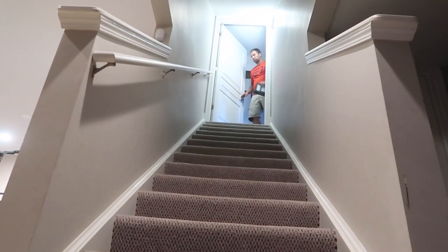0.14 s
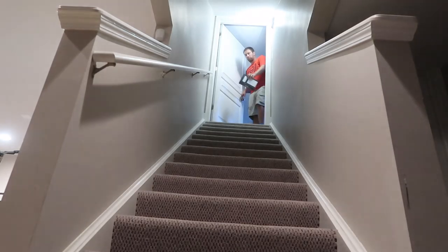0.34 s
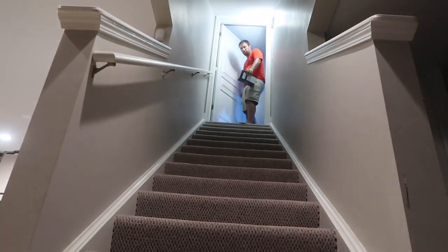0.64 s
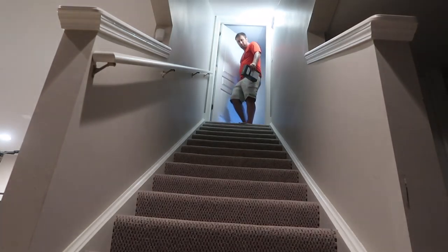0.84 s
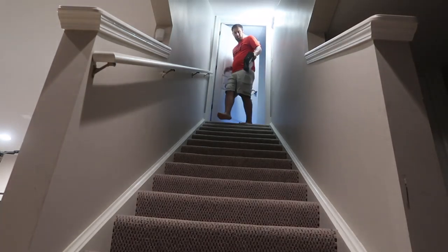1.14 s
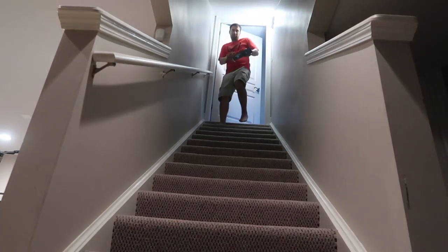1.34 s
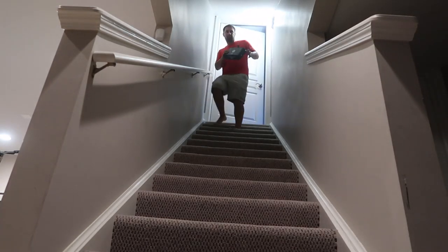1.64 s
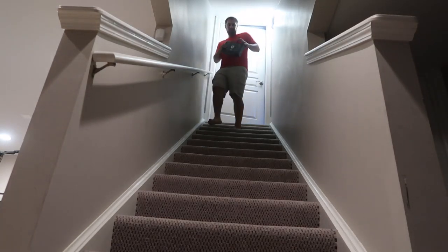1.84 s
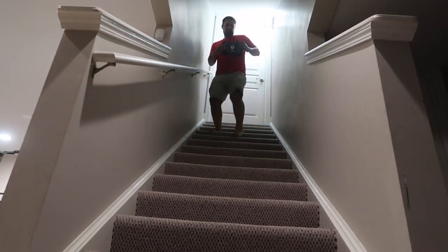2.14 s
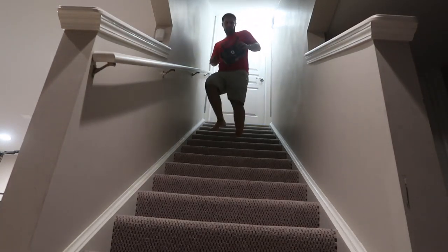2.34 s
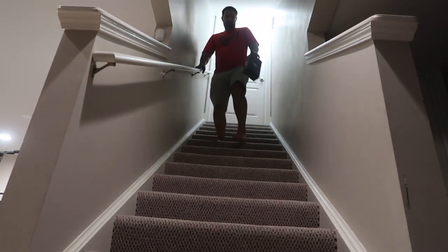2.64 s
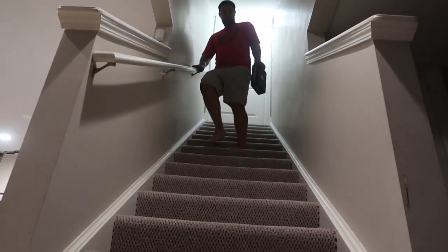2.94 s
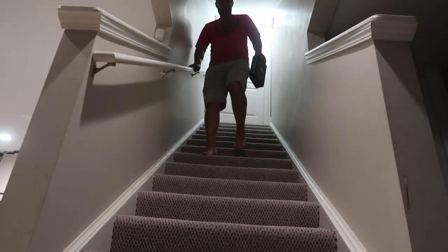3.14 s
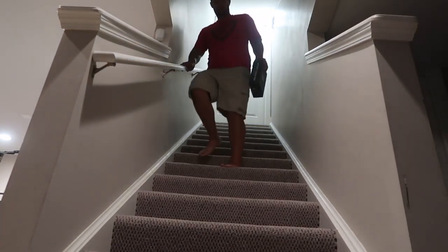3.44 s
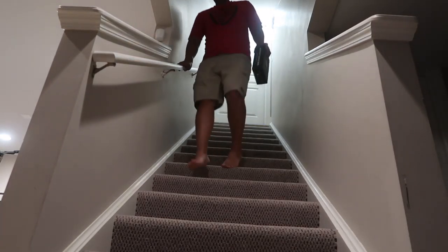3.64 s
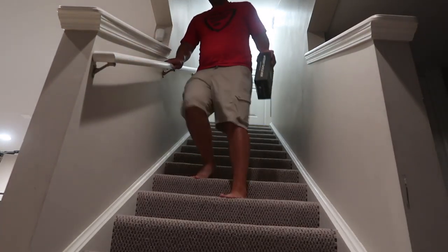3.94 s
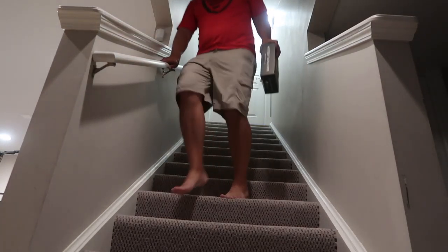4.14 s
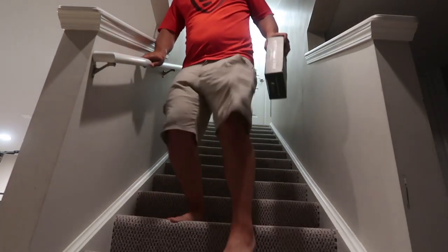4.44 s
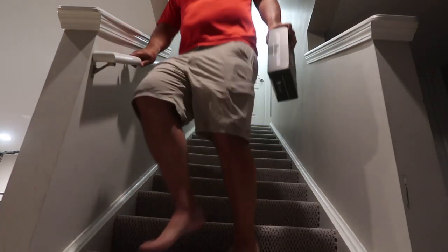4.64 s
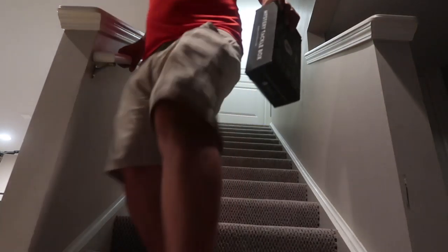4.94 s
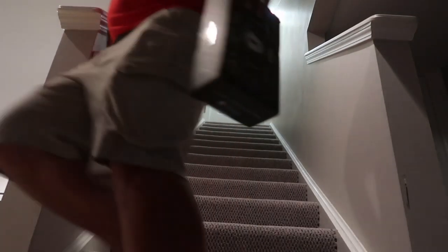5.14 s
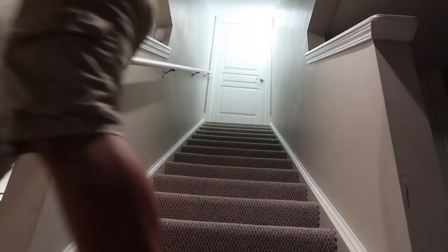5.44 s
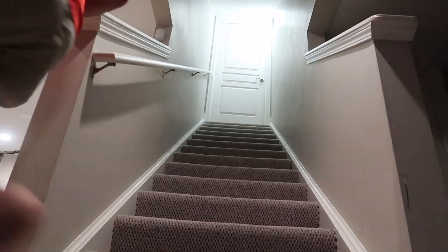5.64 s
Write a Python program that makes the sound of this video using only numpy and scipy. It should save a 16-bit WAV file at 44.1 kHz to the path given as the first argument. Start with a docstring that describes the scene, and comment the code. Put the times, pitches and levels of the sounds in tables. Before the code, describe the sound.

A quiet house interior hums low and steady, with a soft rumble. In the first second there are only faint bumps and small ticks from the top of a staircase. From about 1.4 s, dull footfalls mix with a gritty knob and latch rattle and a tiny metallic tinkle near 1.6 s. A short creaky rub leads to the door shutting with a hard knock at 2.2 s, then a sharp latch snap at 2.56 s. Bare feet thump down carpeted wooden treads at roughly 2.65, 2.8, 2.93, 3.25, 3.4, 3.8 and 3.95 s, low and padded, with airy swishes of cloth and hand on rail. The deepest, loudest thump lands at 4.5 s with small creaks; a firmer, higher-pitched step hits at 5.1 s. Light scuffs and rustles remain until 5.8 s, slightly left and duller. Short stairwell echoes; the microphone stays near the bottom.

```python
"""Door and bare feet on the stairs

A door at the head of a carpeted wooden staircase is pulled shut; bare feet then thump down the treads.
Pushes ring the stair frame in low thumps; blows with gritty rattles make knocks, clatter and creak grains.
Bands of flickering noise make the swish of clothes and of a hand on the rail, the rubbing and the rumble.
The house hums softly: steady noise, with a few narrow resonances fed by noise. The stairwell echoes."""
import sys
import numpy as np
from scipy import signal
from scipy.io import wavfile

SR = 44100
rng = np.random.default_rng(int(sys.argv[2]) if len(sys.argv) > 2 else 0)


def transcribe(signal):
    """Save signal, clipped to [-1, 1], as a 16-bit WAV file at the path in sys.argv[1]."""
    frames = np.atleast_2d(signal).T
    limited = np.clip(frames, -1, 1)
    pcm = np.round(limited * 32767).astype(np.int16)
    wavfile.write(sys.argv[1], SR, pcm)


N = 254898  # length in samples


def from_db(db):
    """Decibels to a plain factor on the wave's size."""
    return 10 ** (np.asarray(db) / 20)


def power_sum_db(*levels_db):
    """Unrelated sounds add by power; gives their joint level in dB."""
    return 10 * np.log10(sum(from_db(db) ** 2 for db in levels_db))


def rms_one(x):
    """Scale a sound to an average strength (RMS) of 1."""
    return x / np.sqrt(np.mean(x ** 2) + 1e-20)


def in_time(rows):
    """Draw straight lines between table rows, one curve for each column after the time."""
    s, *columns = np.transpose(rows)
    return [np.interp(np.arange(N) / SR, s, column) for column in columns]


def at_hz(points, hz):
    """Read a table at a frequency, on a logarithmic frequency scale."""
    table_hz, values = np.transpose(points)
    return np.interp(np.log(hz), np.log(table_hz), values)


def add(track, s, sound):
    """Mix a short sound in at a time."""
    i = round(s * SR)
    track[i:i + len(sound)] += sound[:N - i]


def lowpass(x, order, hz):
    """Keep what lies below a frequency."""
    return signal.sosfilt(signal.butter(order, hz, fs=SR, output="sos"), x)


def highpass(x, order, hz):
    """Keep what lies above a frequency."""
    return signal.sosfilt(signal.butter(order, hz, "high", fs=SR, output="sos"), x)


def resonance(x, hz, width_hz):
    """One vibrating mode: a two-pole filter that passes a narrow band around its pitch."""
    r = np.exp(-np.pi * width_hz / SR)
    gain = (1 - r * r) / 2
    return signal.lfilter(np.array([1, 0, -1]) * gain, [1, -2 * r * np.cos(2 * np.pi * hz / SR), r * r], x)


def drift(rate_hz):
    """Slow random wandering with RMS 1: noise smoothed by two equal poles at the given rate."""
    step = 40  # samples between computed points
    r = np.exp(-2 * np.pi * rate_hz * step / SR)
    noise = rng.standard_normal(N // step + 2002)
    slow = signal.lfilter([1], [1, -2 * r, r * r], noise)[2000:]  # drop the filter's start
    return np.interp(np.arange(N) / step, np.arange(len(slow)), rms_one(slow))


# how alike left and right are: f/Hz, likeness (1 = identical, 0 = unrelated)
LEFT_RIGHT_LIKENESS = [(60, 1), (125, .9999), (180, 1), (250, 0.63), (1000, 0.68), (2000, 0.69),
                       (4000, 0.46), (8000, 0.22), (12000, 0.02)]


def banded_noise(spectrum, patchy_db, tilt_db=0, hump_hz=1000, hump_db=0):
    """Half-octave bands of stereo noise, each with its own level, flicker and left-right likeness."""
    out, power = 0, 0
    together = drift(6)  # flicker shared by all bands
    edges = 22 * 2 ** np.arange(0, 9.8, .5)
    white = rng.standard_normal((2, 2, N))  # neighbouring bands get unrelated noise
    for k, (low, high) in enumerate(zip(edges, edges[1:])):
        hz = np.sqrt(low * high)
        if not .8 * spectrum[0][0] < hz < 1.2 * spectrum[-1][0]:
            continue
        band = signal.butter(2, [low, high], "band", fs=SR, output="sos")
        mid, side = signal.sosfilt(band, white[k % 2])
        alike = at_hz(LEFT_RIGHT_LIKENESS, hz)
        hump = np.exp(-.5 * (np.log2(hz / hump_hz) / 0.3) ** 2)
        colour_db = tilt_db * np.log2(hz / 4000) + hump_db * hump
        flicker_db = patchy_db * (0.6 * together + drift(12.6))
        gain = from_db(at_hz(spectrum, hz) + colour_db + flicker_db)
        out = out + gain * (np.sqrt(1 + alike) * mid + np.sqrt(1 - alike) * side * [[1], [-1]])
        power += from_db(at_hz(spectrum, hz)) ** 2 * 2 * (high - low) / SR
    return out / np.sqrt(2 * power)  # RMS near 1 before colour and flicker


# colour of the quiet house noise: f/Hz, relative level/dB per Hz
HOUSE_COLOUR = [(15, -35), (25, -12), (110, -8), (164, 4), (227, 9.5), (522, -8), (870, -20), (1800, -15),
                (2770, -32), (4610, -16), (13200, -30), (14300, -39), (15500, -73)]


def house_noise():
    """The quiet background of the house is softly flickering noise."""
    return from_db(-59) * banded_noise(HOUSE_COLOUR, patchy_db=1.5)


# wavering hums of the house: f/Hz, width/Hz, level/dB
HOUSE_HUMS = [(54.7, 5.3, -64), (124, 2.5, -57), (241.8, 4.4, -61.5), (13000, 40, -89)]


def hums():
    """Noise through narrow resonances gives hums that waver."""
    out = 0
    for hz, width_hz, level_db in HOUSE_HUMS:
        out = out + from_db(level_db) * rms_one(resonance(rng.standard_normal(N), hz, width_hz))
    return out


def stirred(level_db, share, early_s, t60_s, db_per_oct=0):
    """A level in dB that jumps at every low thump and dies away; level_db is for -21 dB at 120 Hz."""
    s, peak_db, centre_hz = np.transpose(LOW_THUMPS)[:3]
    kick_db = level_db + share * (peak_db + 21.0) + db_per_oct * np.log2(centre_hz / 120)
    kicks = np.zeros(N)
    np.add.at(kicks, ((s - early_s) * SR).astype(int), from_db(kick_db) ** 2)
    fall = from_db(-120 / (t60_s * SR))  # power falls 60 dB in t60_s
    rise = np.exp(-1 / (0.0023 * SR))
    power = signal.lfilter([1 - rise], [1, -fall - rise, fall * rise], kicks + 1e-18)
    return 10 * np.log10(power + 1e-12)


# colour of the stair frame's rumble: f/Hz, relative level/dB per Hz
RUMBLE_COLOUR = [(20, 6), (35, -3.5), (52, 5), (80, 0), (110, 3), (200, -0.5), (400, -16)]


def frame_rumble():
    """The stair frame rumbles at rest and more after each thump; deep thumps shake it most."""
    resting_db = -54
    shaken_db = stirred(level_db=-46.5, share=0.5, early_s=-0.02, t60_s=1, db_per_oct=-6.5)
    return from_db(power_sum_db(resting_db, shaken_db)) * banded_noise(RUMBLE_COLOUR, patchy_db=2.5)


# colour of rubbing and scuffing: f/Hz, relative level/dB per Hz
SCUFF_COLOUR = [(150, -9), (300, 4.5), (500, 0.5), (1000, 3), (1800, -6), (3500, -10.5)]
# steady rubbing of door edge and soles: t/s, level/dB
RUBBING = [(0.0, -55), (.4, -57.5), (.7, -56.5), (1.09, -56.5), (1.53, -50.5), (1.96, -55.5), (2.22, -50),
           (3.64, -55), (4.45, -51.5), (4.95, -51), (5.1, -46.5), (5.3, -48.5), (5.5, -52.5), (5.78, -50)]


def rubbing_and_scuffs():
    """Door edge and soles rub steadily, and every low thump adds a dying scuff, all as noise."""
    scuff_db = stirred(level_db=-52.5, share=0.17, early_s=0, t60_s=.5)
    return from_db(power_sum_db(*in_time(RUBBING), scuff_db)) * banded_noise(SCUFF_COLOUR, patchy_db=1.86)


# colour of the swishes: f/Hz, relative level/dB per Hz
SWISH_COLOUR = [(710, -24), (1200, -35), (1450, -4.5), (1960, -7), (2560, 0), (2820, -3), (4280, -2),
                (7390, -3.5), (12100, -6), (14200, -6.5), (15500, -32)]
# swishes of cloth and of the hand on the rail: start t/s, length/s, level/dB, brightness/dB per octave,
# lift of the hiss near 7 kHz/dB, share of the length spent swelling
STRIDE_SWISHES = [(1.448, 0.088, -53.5, -1, 3, 0.36), (1.497, 0.34, -54.5, -3.5, 0, 0.32),
                  (1.952, 0.7, -56.5, -2, 0, 0.3), (2.55, 0.72, -54, -5, 0.5, 0.23),
                  (2.998, 0.57, -45.5, -4.2, 1, 0.61), (3.307, 0.38, -52.5, -4, -2, 0.55),
                  (3.606, 0.44, -46.5, -4, 0.5, 0.52), (3.864, 0.34, -49, -3.5, 1.5, 0.55),
                  (4.179, 0.46, -48, -3, 5.5, 0.44), (4.4, 0.39, -49.5, -2, -1, .45),
                  (4.62, 1, -54.5, -0.2, 0, 0.28), (5.493, 0.72, -51.5, -3.5, -3, 0.29)]


def swishes():
    """Each swish of rubbing cloth or hand is noise that swells and fades smoothly with its own colour."""
    t = np.arange(N) / SR
    start, length, level_db, bright_db, hiss_db, swell = np.transpose(STRIDE_SWISHES)[:, :, None]
    part = np.clip((t - start) / length, 0, 1)
    shape = np.sin(np.pi / 2 * np.minimum(part / swell, (1 - part) / (1 - swell)))
    power = (from_db(level_db) * shape ** 1.3) ** 2
    still = from_db(-61.5) ** 2  # rustle between swishes
    total = power.sum(axis=0) + still
    # overlapping swishes blend their colours by power; the rustle leans -3 dB per octave
    tilt_db = ((power * bright_db).sum(axis=0) - 3 * still) / total
    hump_db = (power * hiss_db).sum(axis=0) / total
    noise = banded_noise(SWISH_COLOUR, patchy_db=1.36, tilt_db=tilt_db, hump_hz=6650, hump_db=hump_db)
    return np.sqrt(total) * noise


# a loose metal part of the knob tinkles: t/s, level/dB (RMS starts 2 dB lower), f/Hz
KNOB_TINKLES = [(1.484, -56, 9500), (1.5289, -54, 8900), (1.628, -49, 8700), (1.638, -55, 8800),
                (1.647, -50, 8900), (1.6624, -49, 8900), (1.688, -58, 8800)]


def tinkles():
    """Loose metal gives short high rings, roughened because noise drives the resonance."""
    width_hz, t60_s = 500, .05
    out, t = np.zeros(N), np.arange(int(.1 * SR)) / SR
    for s, level_db, hz in KNOB_TINKLES:
        noise = rng.standard_normal(len(t))
        ring = rms_one(resonance(noise, hz, width_hz)) * from_db(-60 * t / t60_s)
        add(out, s, from_db(level_db - 2.0) * ring)
    return out


def knocks(rows, body):
    """Each knock is a blow and a short gritty rattle; dense modes ring on as dying noise in each resonance."""
    out, t = np.zeros(N), np.arange(int(.25 * SR)) / SR
    for s, level_db, tilt_db, share, blow_db, top_hz, rattle_ms in rows:
        contacts, dense = rng.standard_normal((2, len(t)))
        rattle = np.exp(-1000 * t / rattle_ms)
        blow = from_db(blow_db) * (t == 0)  # a single sample
        grit = contacts ** 2 * np.sign(contacts)  # squaring makes strong contacts stand out
        strike = 0.45 * grit * rattle * np.minimum(t / 0.0022, 1) + blow
        knock = 0
        for k, (hz, width_hz, mode_db, t60_s) in enumerate(body):
            ringing = from_db(-6.5) * from_db(-60 * t / (t60_s * share)) * (1 - rattle)
            drive = strike + np.roll(dense, 500 * k) * ringing
            gain = (-1) ** k * from_db(mode_db + tilt_db * np.log2(hz / 1000))
            knock = knock + gain * resonance(drive, hz, width_hz)
        knock = lowpass(knock, 3, top_hz) + from_db(-46) * blow  # plus a faint bare click
        early_rms = np.sqrt(np.mean(knock[:round(.006 * SR)] ** 2))
        add(out, s, from_db(level_db - 7.5) * knock / early_rms)
    return out


# the latch bolt snaps and grates: t/s, level/dB (RMS of the first 6 ms is 7.5 dB lower),
# treble tilt/dB per octave, ring time as a share of t60, first blow/dB, highest pitch excited f/Hz,
# time constant of the rattle/ms
LATCH_SNAPS = [(1.121, -36, -2.5, 0.68, 19, 9000, 1.8), (1.583, -36, 4, .8, -3, 5000, 5.8),
               (1.596, -34.5, -2, 0.88, -3, 5000, 8.5), (1.625, -27.5, 2, 0.93, 4, 13000, 4),
               (1.645, -31, 0.5, 1, 9, 7000, 5.3), (1.654, -31, -1, 1, 10, 6000, 3.6),
               (2.564, -14.5, -0.5, 0.87, 13, 8000, 2.4)]
# resonances of the latch: f/Hz, width/Hz, level/dB, t60/s
LATCH_MODES = [(495, 350, -12, 0.036), (873, 140, 1, 0.03), (1130, 130, -1, 0.016), (1460, 74, -8.5, .04),
               (1980, 170, -18.5, 0.033), (3140, 360, -18, 0.016), (5170, 780, -23.5, .008),
               (8500, 810, -29, .006)]


def latch():
    """The bolt's snaps and grating set the small resonances of the latch ringing."""
    return knocks(LATCH_SNAPS, LATCH_MODES)


# knocks hard and soft, clatter, short rustles and creak grains: t/s,
# level/dB (RMS of the first 6 ms is 7.5 dB lower), treble tilt/dB per octave, ring time as a share of t60,
# first blow/dB, highest pitch excited f/Hz, time constant of the rattle/ms
KNOCKS_AND_CLATTER = [(0.626, -45, 1, 1, 5, 8000, 6.3), (0.739, -43.5, -4, 2, -12, 5000, 14),
                      (.797, -47, -7, 1, 5, 2000, 3), (1.037, -46, -6, 0.63, 3, 6000, 4),
                      (1.458, -43, -7, 1.3, -10, 6000, 21), (1.486, -41.5, -3, 0.89, -8, 11000, 6.1),
                      (1.529, -39, -6, 1.2, 7, 11000, 4.2), (1.541, -41, 4, .7, 3, 12000, 2.8),
                      (1.603, -41, 2, .81, -2, 4500, 7), (1.633, -29.5, -1.5, .6, 8, 4500, 2.2),
                      (1.639, -28, -6.5, 0.8, 9, 5000, 3), (1.663, -38.5, 3, .7, 8, 14000, 4),
                      (1.971, -35.5, -9.5, 2.1, 7, 8000, 6), (2.1, -44, -5, 1.5, -10, 9000, 14),
                      (2.12, -38, -5.5, 1.6, -10, 9000, 13), (2.14, -35, -10, 1.7, -10, 6000, 10),
                      (2.159, -33.5, -11, 2.2, -8, 5000, 10), (2.18, -34.5, -8, 1.4, -8, 5000, 8),
                      (2.2, -34, -6, 1.8, 0, 5000, 5), (2.212, -35, -4, 1.2, 0, 9500, 4.4),
                      (2.226, -16.5, 2.5, 0.73, 3, 8400, 5.3), (2.234, -18, 0, 0.9, 16, 7000, 7.1),
                      (2.243, -24, 3, 1.4, 13, 8000, 4), (2.258, -32, 3, 0.81, 8, 5000, 5.4),
                      (2.282, -34, 3, .9, 5, 5500, 3.6), (2.306, -27, -4.5, 1.1, 13, 5000, 4.8),
                      (2.322, -36, 4, .6, 3, 2500, 5), (2.322, -48, 9, 0.66, 5, 13000, 3.2),
                      (2.334, -37, -4, 1.1, 9, 7000, 3.3), (2.39, -38, -4, 0.66, 12, 7000, 5.1),
                      (2.446, -47, -5, .7, 10, 9200, 3), (2.49, -42, 9.5, 0.72, 13, 9100, 4),
                      (2.497, -36, -6.5, 1.3, -6, 8000, 4), (2.573, -26.5, -2, 0.9, 0, 2600, 6),
                      (2.585, -30, -0.5, .8, 3, 6500, 4.4), (2.596, -32, -10, 1.14, -9, 2800, 6),
                      (2.608, -37, 4, .7, 7, 2600, 5), (2.654, -38, 2, 0.78, 0, 4000, 6),
                      (2.672, -37.5, 0, .7, -5, 5000, 8.9), (2.742, -44, 3, .8, -8, 5000, 10),
                      (2.947, -37, 0, 1.6, 15, 8500, 4.4), (4.011, -39, -2, 0.68, 5, 3000, 2.6),
                      (4.023, -41.5, -8, .7, 0, 3000, 5), (4.036, -36, -5, .8, 3, 5000, 3.7),
                      (4.047, -42, 6, .7, 3, 6000, 4), (4.06, -41, 2, 1, -5, 5000, 9),
                      (4.075, -48, 1, 0.96, 0, 4000, 4.2), (4.209, -39, -3.5, 0.64, 21, 8500, 4),
                      (4.59, -32, -9, 0.88, 12, 8500, 4), (4.598, -40, -1, 1, 0, 5000, 5),
                      (4.608, -38.5, -2, 1.2, 7, 6000, 4.9), (4.636, -42, -3, .8, 0, 4000, 5),
                      (4.728, -40, 3.5, 0.58, 14, 8000, 2.6), (4.807, -39.5, -8, 0.89, 0, 8500, 4.5),
                      (5.092, -28, -11, 0.36, 22, 2000, 2.6), (5.108, -37.5, -10, .7, -2, 2500, 8.2),
                      (5.13, -42, 2.5, 1.5, 10, 8500, 3.2), (5.213, -40, 3, 0.65, 10, 8000, 3),
                      (5.389, -43, 4, 0.84, 20, 9000, 3.6), (5.51, -35, -9.5, 0.45, 16.5, 8500, 4.7),
                      (5.702, -40, -7, 0.49, 2, 8500, 3.6), (5.735, -41, 0, 1.2, -8, 2800, 17)]
# broad resonances of door panel and hardware: f/Hz, width/Hz, level/dB, t60/s
DOOR_MODES = [(338, 73, -3.5, 0.21), (540, 380, -3, 0.17), (867, 93, 5.5, 0.062), (976, 70, 7.5, 0.032),
              (1122, 140, 6.5, 0.028), (1470, 190, 1.5, 0.052), (1860, 300, 3, 0.038),
              (2270, 310, -2, 0.053), (2897, 180, -1.5, 0.048), (3230, 165, 0, 0.029),
              (3540, 200, -2.5, 0.037), (4000, 730, -8, 0.043), (5200, 500, -11, 0.025),
              (6070, 440, -9, 0.017), (6790, 1000, -16.5, 0.023), (8400, 1700, -24, 0.015),
              (11000, 4000, -25, 0.015), (14000, 2500, -26, .015)]


def knocks_and_clatter():
    """Knocks hard and soft, clatter, rustles and creak grains all sound through the same broad resonances."""
    return knocks(KNOCKS_AND_CLATTER, DOOR_MODES)


# low thumps: feet on the treads, the door shutting, and settling: t/s, peak level/dB,
# centre of the ring f/Hz, base ring time/s, slap/dB over the peak (before its modes' levels)
LOW_THUMPS = [(0.093, -35.5, 184, .3, -16), (0.629, -45, 58.3, .085, -24), (0.828, -43, 118, 0.34, -16),
              (1.318, -39.5, 118, 0.35, -29), (1.396, -26.5, 97, 0.11, -21), (1.422, -24.5, 117, 0.2, -38),
              (1.455, -31.5, 133, 0.17, -11), (1.577, -27.5, 52.3, 0.063, -11),
              (1.628, -25.5, 138, 0.15, -15), (2.08, -26, 56, 0.25, -35), (2.112, -26, 138, 0.38, -18),
              (2.164, -36, 298, .25, -11), (2.184, -34, 296, 0.24, -7), (2.205, -32, 350, 0.17, -5),
              (2.236, -19.5, 120, 0.078, -24), (2.26, -22.5, 118, 0.19, -15.5),
              (2.289, -31.5, 47.6, 0.5, -28), (2.397, -37.5, 103, 0.15, -28), (2.648, -16, 154, 0.13, -32),
              (2.675, -21.5, 152, 0.19, -21), (2.693, -23, 137, 0.2, -33),
              (2.803, -17.5, 166, 0.068, -16.5), (2.824, -19, 133, .17, -14),
              (2.715, -30.5, 55.3, 0.21, -32), (2.849, -32.5, 51.5, 0.13, -12),
              (2.928, -18.5, 143, 0.15, -31), (2.946, -21.5, 128, 0.15, -21), (3.207, -31, 149, 0.13, -14),
              (3.22, -23, 128, 0.25, -25), (3.244, -19, 121, 0.19, -31), (3.265, -29, 125, .14, -30),
              (3.299, -30.5, 126, 0.14, -30), (3.371, -29.5, 198, .06, -10), (3.378, -17, 149, 0.13, -15),
              (3.407, -23.5, 119, 0.12, -16), (3.436, -28, 99, 0.23, -15), (3.768, -30, 148, 0.19, -14),
              (3.799, -25, 136, 0.19, -23), (3.808, -29.5, 127, 0.12, -21), (3.832, -28, 78.6, 0.095, -31),
              (3.871, -36, 72, 0.1, -22), (3.947, -22.5, 120, 0.21, -10.5), (3.991, -28.5, 95, 0.23, -9),
              (4.023, -32.5, 190, 0.081, -10), (4.032, -30, 240, 0.094, -14),
              (4.062, -29.5, 203, 0.12, -25), (4.352, -26.5, 110, 0.19, -15.5),
              (4.399, -29, 118, 0.24, -28), (4.47, -32, 104, .068, -28), (4.511, -19, 176, 0.093, -13),
              (4.521, -10, 116, 0.18, -19), (4.548, -23.5, 150, 0.16, -20), (4.589, -28.5, 115, 0.14, -7.5),
              (4.658, -34, 124, 0.074, -25), (4.754, -27, 101, 0.15, -18), (4.868, -30, 204.5, .088, -8),
              (4.92, -33.5, 159, 0.058, -16), (5.073, -24, 165, 0.088, -13.5),
              (5.087, -14, 340, 0.046, -12), (5.093, -21.5, 252, 0.057, -26), (5.106, -29, 190, 0.075, -14),
              (5.152, -29.5, 110, 0.06, -12.5), (5.198, -36.5, 340, 0.084, -20),
              (5.225, -34.5, 198, .1, -25), (5.25, -32, 230, 0.11, -23), (5.505, -43, 129, .11, -17)]
# modes of treads and stair frame: f/Hz, level/dB, t60 as a share of the base ring time
STAIR_MODES = [(36.55, -11, 3.6), (53.7, -18, 1.2), (69.5, -16.5, 2.5), (82, -37, 0.43), (104, 3, 1.15),
               (118, 5, 0.95), (156, 3.5, 1.16), (182.6, 6.5, 1.05), (222, 1.5, 1.04), (280.5, -4.5, 2.2),
               (297, 4, 0.95), (388, 14.5, 0.3), (439, 8.5, 0.64)]
# modes that a slap adds: f/Hz, level/dB, t60/s
SLAP_MODES = [(229.4, 9, 0.056), (311, -4.5, 0.059), (381, -1, 0.069), (447, -4.5, 0.035), (566, -7, 0.03),
              (730, -3.5, 0.03), (900, -9, 0.039), (1430, -31, 0.0091), (1950, -12, 0.02)]


def low_thumps():
    """A padded push and rebound rings the stair modes, most of all those near the thump's own pitch."""
    ring_octaves = .47  # spread of the ring around that pitch
    peak_after_s, slap_after_s = 0.00902, 0.00295  # thump peak and slap follow the first touch
    out, t = np.zeros(N), np.arange(int(.4 * SR))[:, None] / SR
    hz, mode_db, share = np.transpose(STAIR_MODES)
    slap_hz, slap_mode_db, slap_t60 = np.transpose(SLAP_MODES)
    for s, peak_db, centre_hz, ring_s, slap_db in LOW_THUMPS:
        nearness = np.exp(-.5 * (np.log2(hz / centre_hz) / ring_octaves) ** 2)
        fading = from_db(mode_db - 60 * t / (share * ring_s))
        ring = (nearness * fading * np.sin(2 * np.pi * hz * t)).sum(axis=1)
        # soft padding spreads the push in time; it lasts more cycles where the slap is stronger
        contact_cycles = max(2.07 + 0.09 * (slap_db + 22.5), .8)
        cycles = np.arange(0, contact_cycles, centre_hz / SR)
        push = np.hanning(len(cycles)) * np.sin(2 * np.pi * (cycles - cycles[-1] / 2))
        thump = signal.fftconvolve(ring, push)
        peak_at = np.abs(thump).argmax()
        add(out, s + peak_after_s - peak_at / SR, from_db(peak_db) * thump / np.abs(thump).max())

        sign = rng.choice([-1, 1], len(SLAP_MODES))
        slap_fading = sign * from_db(slap_mode_db - 60 * t / slap_t60)
        slap = (slap_fading * np.sin(2 * np.pi * slap_hz * t)).sum(axis=1)
        add(out, s + slap_after_s, from_db(peak_db + slap_db) * slap * np.minimum(t[:, 0] / 0.0026, 1))
    return highpass(out, 2, 35)  # little deep bass is radiated


def stairwell(x):
    """Dense echoes off the walls whose treble dies first; the sides differ mostly in short waves."""
    t60_s, wall_cut_hz = 0.35, 2500
    t = np.arange(int(t60_s * SR)) / SR
    mid, side = rng.standard_normal((2, len(t)))
    noise = mid + 0.47 * highpass(side, 1, 4000) * [[1], [-1]]
    dull = lowpass(noise, 1, wall_cut_hz)
    bright = (noise - dull) * np.exp(-t / 0.039)
    tail = (dull + bright) * from_db(-60 * t / t60_s) * (t > .004)  # echoes begin after 4 ms
    return signal.fftconvolve(x[None], tail / np.sqrt(np.sum(tail[0] ** 2)), axes=1)[:, :N]


# the highest treble dies away at the end: t/s, edge f/Hz
TREBLE_EDGES = [(0, 15000), (5.25, 15000), (5.55, 13000), (5.78, 9600)]


def dim_treble(x):
    """Split off the treble in bands and fade out those above a moving edge."""
    edge_hz, = in_time(TREBLE_EDGES)
    out, below = 0, 0
    for hz in (9000, 10500, 12000, 13500, 15000):
        low = signal.sosfiltfilt(signal.butter(6, hz, fs=SR, output="sos"), x)
        out = out + (low - below) * np.clip((edge_hz - hz) / 1500 + 1, 0, 1)
        below = low
    return out + (x - below) * np.clip((edge_hz - 15000) / 1000, 0, 1)


# the sound leans left at the end: t/s, left over right level/dB
LEFT_LEAN = [(0, 0), (5, 0), (5.4, .6), (5.78, 1.6)]


def lean_left(x):
    """Raise the left and lower the right, but hardly for long waves, which have no side."""
    lean_db, = in_time(LEFT_LEAN)
    return x + highpass(x, 1, 150) * (from_db(lean_db / 2 * [[1], [-1]]) - 1)


def scene():
    """Mix house, soft noises, clatter and low thumps, with echoes of the clatter and thumps."""
    house = house_noise() + hums()
    moving = frame_rumble() + rubbing_and_scuffs() + swishes()
    clatter = tinkles() + latch() + knocks_and_clatter()
    thumps = low_thumps()
    echoes = stairwell(from_db(-15.5) * thumps + from_db(-6.0) * clatter)
    return lean_left(dim_treble(house + moving + clatter + thumps + echoes))


def record(dry):
    """The microphone droops at the very top, then the top is cut."""
    droop = lowpass(dry, 4, 14600)
    return signal.sosfilt(signal.cheby2(16, 60, 15750, fs=SR, output="sos"), droop)


dry = scene()
out = record(dry)
transcribe(out)
```